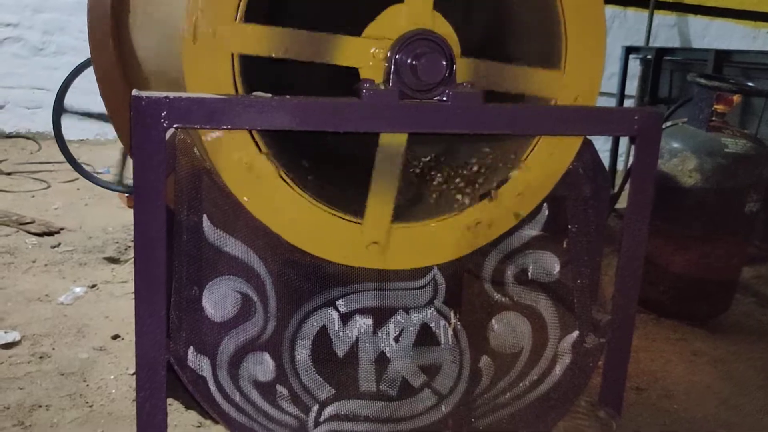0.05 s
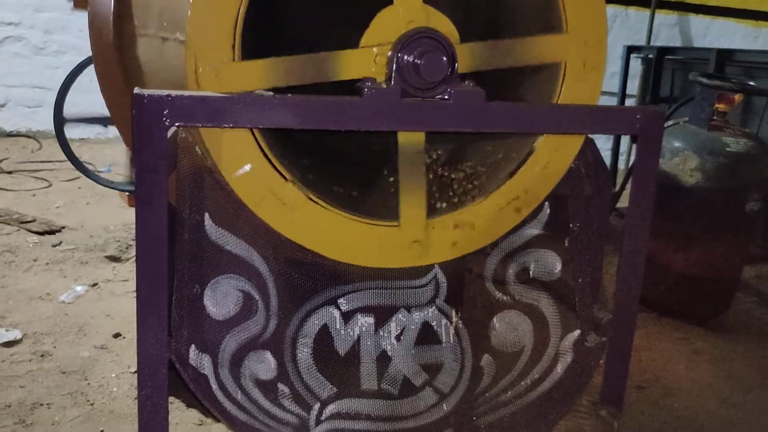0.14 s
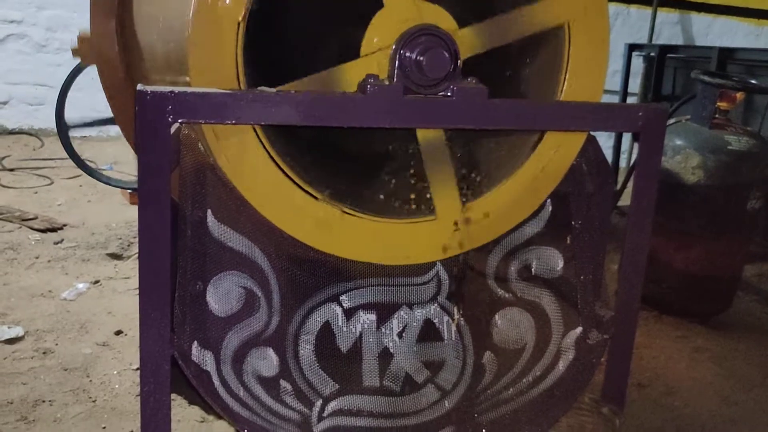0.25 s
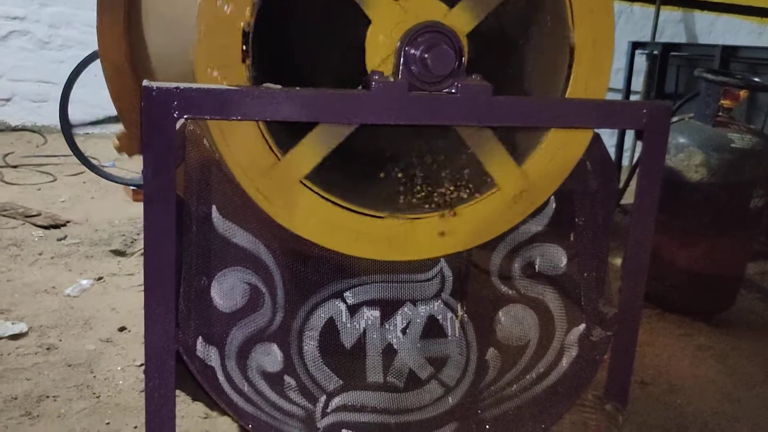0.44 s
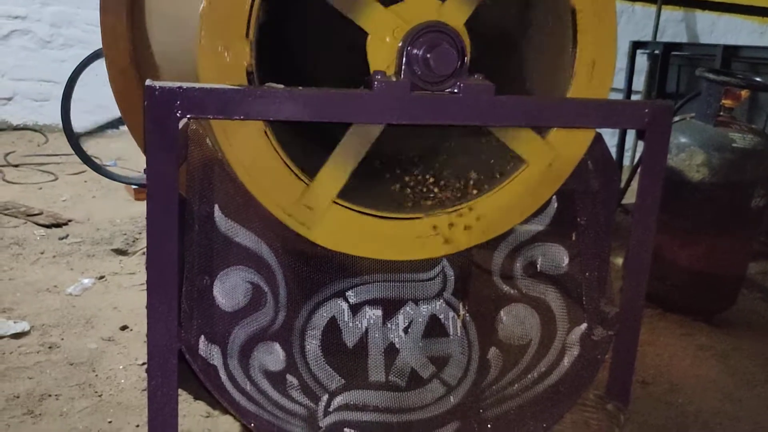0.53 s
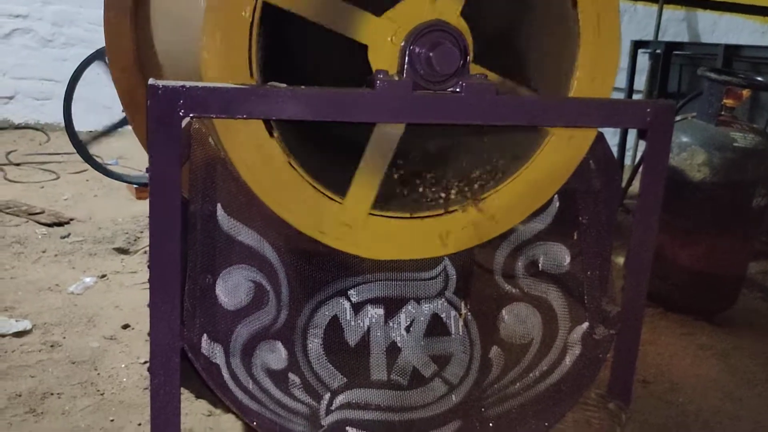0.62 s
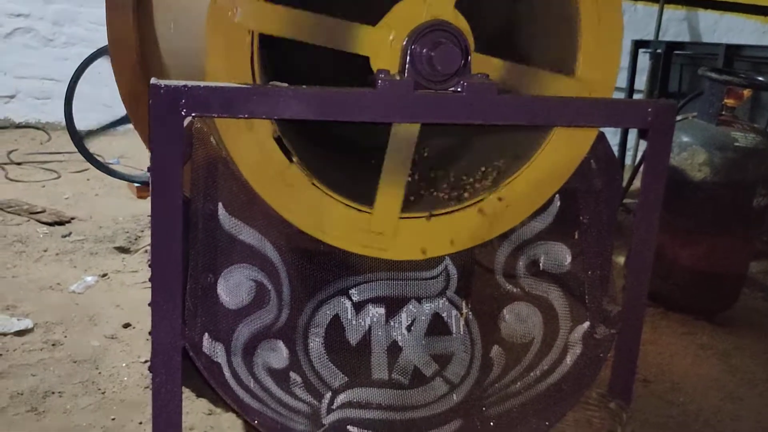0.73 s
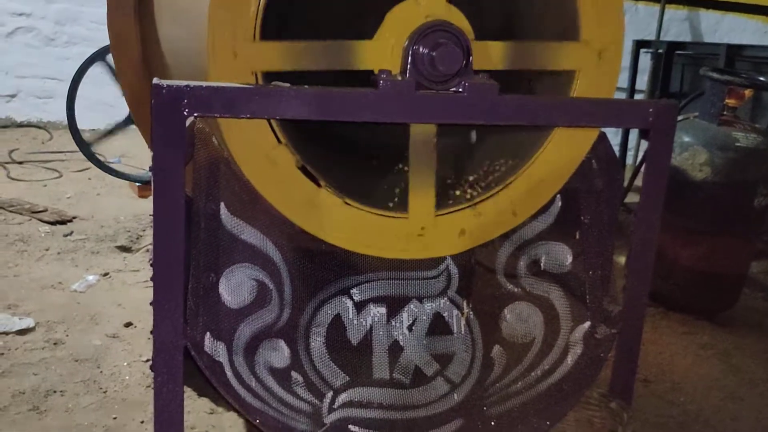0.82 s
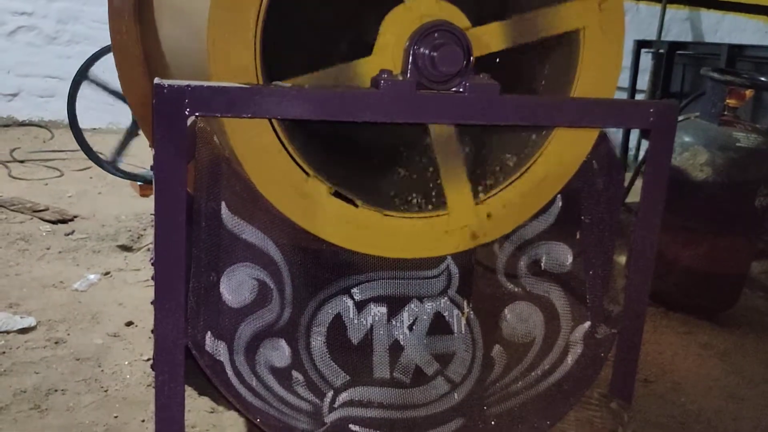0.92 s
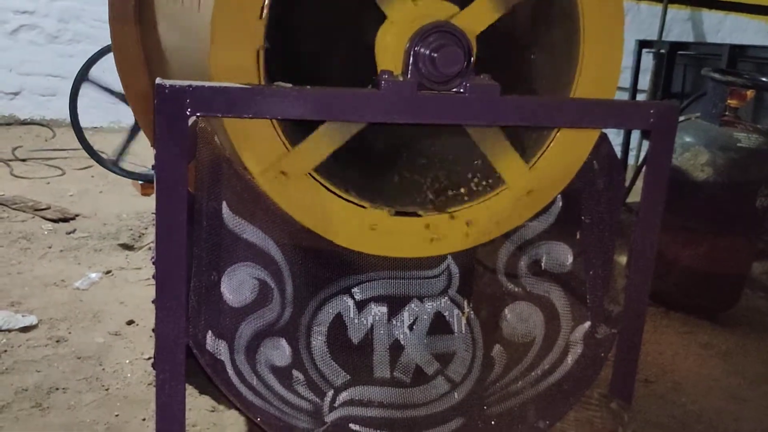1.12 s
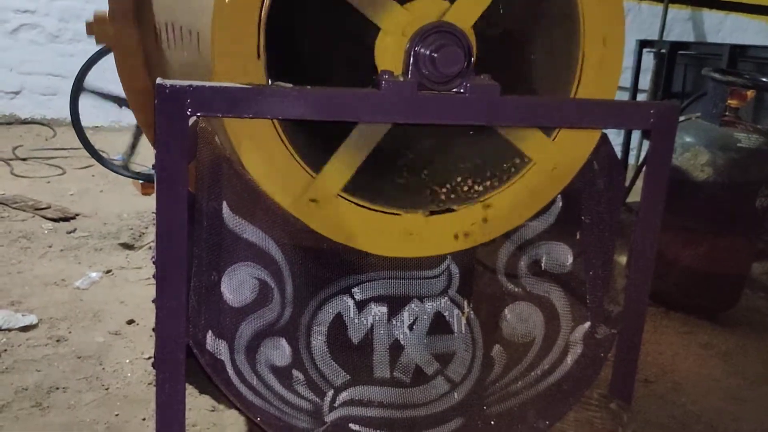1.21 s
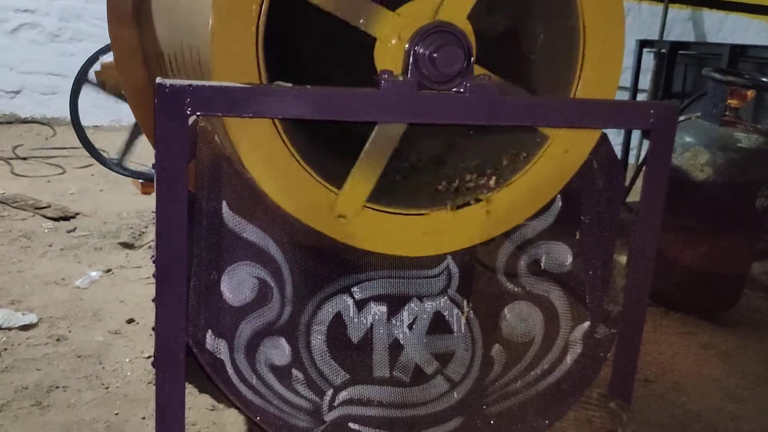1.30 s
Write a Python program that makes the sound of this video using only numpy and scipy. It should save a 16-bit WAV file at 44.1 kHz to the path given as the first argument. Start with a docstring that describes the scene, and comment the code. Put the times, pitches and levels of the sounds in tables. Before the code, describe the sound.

A steel roasting drum gives one sharp, rattling clank as an earlier one fades. The metal rings away while grain patters softly inside over a low burner rumble and motor hum, heard close by in an open yard.

```python
"""A loose part drops against a steel roasting drum that turns over a burner in an open yard, heard close by.
The impact gives a short, bright chatter and excites the shell's modes, which ring on in free decay;
an earlier clank is still dying away. Grain slides and patters inside, friction makes the steel sing
faintly, and a motor hums under the broadband rumble of the burner."""
import sys
import numpy as np
from scipy import signal
from scipy.fft import rfft, irfft
from scipy.io import wavfile

SR = 44100
rng = np.random.default_rng(int(sys.argv[2]) if len(sys.argv) > 2 else 0)


def store_wav(level_fs):
    """Save 16-bit WAV to argv[1]."""
    pcm = np.round(np.clip(np.atleast_2d(level_fs), -1, 1) * 32767)
    wavfile.write(sys.argv[1], SR, pcm.T.astype(np.int16))


N = 59535
TIME = np.arange(N) / SR

# drops of the loose part: start_s, gain_db
CLANK_EVENTS = [(-.26, 0), (.2385, 0)]
# contacts within one clank: delay_s, relative_db
CLANK_CONTACTS = [(0, -3), (.0045, 0), (.008, 1), (.0125, 0), (.0215, 1), (.025, -1)]
# strong modes of the shell: pitch_hz, relative_db, left_minus_right_db
SHELL_MODES = [(125.0, -26.0, -1.0), (244.0, -30.0, -3.0), (275.0, -29.0, 0.0), (355.0, -29.0, -1.0),
               (410.0, -25.0, -2.0), (432.0, -27.0, 8.0), (459.0, -29.0, -3.0), (564.0, -32.0, -4.0),
               (583.0, -30.0, 7.0), (614.0, -25.0, -7.0), (639.0, -32.0, 3.0), (814.0, -26.0, 5.0),
               (844.0, -27.0, 3.0), (873.0, -23.0, -11.0), (961.0, -34.0, 5.0), (1039.0, -25.0, -10.0),
               (1070.0, -27.0, 10.0), (1285.0, -33.0, 1.0), (1335.0, -34.0, -1.0), (4373.0, -33.0, -1.0),
               (5561.0, -26.0, -4.0), (5640.0, -29.0, 6.0), (6207.0, -18.0, 15.0), (6324.0, -23.0, 17.0),
               (6877.0, -24.0, -1.0), (7066.0, -27.0, -0.0), (7161.0, -19.0, -5.0)]
# spectrum of the steel's dense modes: frequency_hz, relative_density_db
STEEL_SPECTRUM = [(25, -18.5), (60, -17.5), (120, -4.5), (200, -10), (430, -7), (700, -5.5), (1000, -8.5),
                  (1400, -16), (2300, -9.5), (3300, -12), (4900, -8.5), (6100, 1.5), (7200, 6),
                  (7800, -6.5), (8600, -43.5)]
# decay time of the steel: frequency_hz, t60_s
STEEL_DECAY = [(100, 1.73), (400, 1.455), (900, 0.99), (1400, 0.99), (2500, 0.39), (4500, 0.28),
               (7000, 0.23)]
# damped resonances of the drum's body: pitch_hz, relative_db
BODY_MODES = [(112, -26), (141, -23), (446, -17), (835, -21), (1052, -25)]
# spectrum of the grain and the chatter: frequency_hz, relative_density_db
GRAIN_SPECTRUM = [(300, -3), (1200, -9.5), (2300, -2.5), (3400, -8.5), (5000, -5), (6300, 2), (7400, 2.5),
                  (7800, -6.5), (8150, -52)]
# flow of the grain: time_s, level_db
GRAIN_FLOW = [(0, -45), (.08, -43), (.2, -39), (.45, -39), (.55, -42), (.7, -39), (.77, -41.5), (.92, -42),
              (1.06, -45), (1.14, -40.5), (1.25, -47.5), (1.3, -46.5), (1.35, -45)]
# single kernels striking the steel: start_s, level_db
KERNEL_HITS = [(0.0236, -31), (0.4658, -34), (0.9311, -38), (1.0176, -36), (1.134, -52), (1.284, -34.5),
               (1.293, -34)]
# drum modes driven by the grain: pitch_hz, relative_db, left_minus_right_db
STIRRED_MODES = [(1730, -25, 5), (2331, -19, 2), (2420, -23, 5), (2990, -24, 5), (3410, -26, 1),
                 (4210, -26, -4), (4480, -24, 7), (4680, -26, 1), (4760, -25, 0), (5238, -20, 0),
                 (7063, -13, -8), (7390, -18, -9)]
# strength of the rubbing: time_s, gain_db
RUBBING_STRENGTH = [(0, 10.5), (.08, -11), (.15, 11), (.22, 9), (.5, 0), (.64, -2.5), (.72, 9.5),
                    (.78, 5.5), (.85, 0), (1.04, -15), (1.11, 7.5), (1.16, 5), (1.22, -5), (1.35, -16)]
# squeaks of scraped steel: centre_s, half_length_s, pitch_hz, level_db
SCRAPE_SQUEAKS = [(.69, .03, 7100, -47), (1.102, .022, 5260, -50), (1.16, .025, 5230, -57)]
# spectrum of the burner: frequency_hz, relative_density_db
BURNER_SPECTRUM = [(20, -36), (35, -38), (55, -3.5), (110, -2.5), (220, -4.5), (420, -11.5), (700, -13),
                   (1300, -20), (3000, -37.5), (8000, -73.5)]
# drone of the turning drum: pitch_hz, level_db
DRONE_MODES = [(122, -49.5), (185, -50.5), (274, -69), (355, -52), (431, -49.5)]
# hum of the motor: time_s, level_db
HUM_LEVEL = [(0, -47), (.68, -48), (.78, -41.5), (.98, -50), (1.1, -41), (1.35, -42)]
# likeness of the two channels: frequency_hz, correlation
STEREO_CORRELATION = [(100, 0.99), (250, 0.99), (500, 0.58), (1000, 0.4), (3000, 0), (7000, 0)]
# balance of the two channels: frequency_hz, left_minus_right_db
STEREO_BALANCE = [(100, -2.5), (600, -1), (1400, 3.5), (2500, 4.5), (5000, -0.5), (6300, 6.5), (7400, -5)]


def clank(dense_db=-5.5, bloom_s=0.0025):
    """Impact excitation: the energies of successive contacts add up in the vibrating steel."""
    t = np.arange(2 * N) / SR
    energy = sum(amp(db) ** 2 * (t >= delay) for delay, db in CLANK_CONTACTS)
    dense = amp(dense_db) * dense_modes(t)
    shell = shell_ring(t) * (1 - np.exp(-t / bloom_s))
    return body_boom(t) + np.sqrt(energy / energy[-1]) * (dense + shell)


def dense_modes(t):
    """Modal overlap: crowded modes merge into noise, and damping removes the treble first."""
    noise = colour(rng.standard_normal((2, len(t))), STEEL_SPECTRUM)
    hz, frame_s, spectra = signal.stft(noise, SR, nperseg=512)
    decay = amp(-60 * frame_s / at_hz(STEEL_DECAY, hz)[:, None])
    return signal.istft(spectra * decay, SR, nperseg=512)[1][:, :len(t)]


def shell_ring(t, gain_db=1):
    """Free vibration: each mode is a damped sinusoid, and modes close in frequency beat."""
    shell = 0
    for hz, db, side_db in SHELL_MODES:
        # the cosine of the phase gap between the channels is their correlation
        gap = np.arccos(at_hz(STEREO_CORRELATION, hz)) * rng.choice([-1, 1])
        phase = 2 * np.pi * rng.random() + np.array([[0], [gap]])
        ring = np.sin(2 * np.pi * hz * t + phase) * dying(t, at_hz(STEEL_DECAY, hz))
        shell = shell + amp(db + gain_db) * unit(pan(side_db)) * ring
    return shell


def body_boom(t, ramp_s=0.018, t60_s=0.21):
    """Damped resonance: the body's low modes swell and die quickly."""
    modes = sum(amp(db) * np.sin(2 * np.pi * hz * t) for hz, db in BODY_MODES)
    return modes * t / ramp_s * dying(t, t60_s)


def chatter(gain_db=-17, t60_s=0.071, spread_db=3, cracks_per_s=1400):
    """Sliding contact: each contact skids in a decaying run of bright, random impulses."""
    t = np.arange(SR // 4) / SR
    energy = sum((amp(db) * (t >= delay) * dying(abs(t - delay), t60_s)) ** 2
                 for delay, db in CLANK_CONTACTS)
    sizes = amp(spread_db * np.minimum(rng.exponential(1, len(t)), 4))
    cracks = sizes * (rng.random(len(t)) < cracks_per_s / SR) * rng.standard_normal((2, len(t)))
    return amp(gain_db) * np.sqrt(energy) * colour(cracks, GRAIN_SPECTRUM)


def grain(impacts_per_s=1600, spread_db=2, kernel_t60_s=0.037):
    """Shot noise: many small impacts over a sliding wash of equal power, with a few distinct kernels."""
    sizes = amp(spread_db * np.minimum(rng.exponential(1, N), 5))
    impacts = sizes * (rng.random(N) < impacts_per_s / SR) * rng.standard_normal((2, N))
    wash = rng.standard_normal((2, N))
    drive = level(GRAIN_FLOW) * unit(unit(impacts) + wash)
    t = np.arange(SR // 8) / SR
    for start_s, db in KERNEL_HITS:
        add(drive, start_s, amp(db) * dying(t, kernel_t60_s) * rng.standard_normal((2, len(t))))
    return np.std(drive) * colour(drive, GRAIN_SPECTRUM)


def stirred_steel(gain_db=2):
    """Forced vibration: the drum's modes ring faintly in proportion to the flow of grain."""
    return amp(gain_db) * level(GRAIN_FLOW) * resonances(STIRRED_MODES, width_hz=17)


def rubbing_steel(squeal_hz=2078, waver_hz=4, gain_db=-58.5, side_db=12):
    """Friction-induced vibration: a thin, wavering squeal and short, rough squeaks."""
    pitch_hz = squeal_hz + waver_hz * resonance(0, width_hz=40)
    squeal = unit(np.sin(2 * np.pi * np.cumsum(pitch_hz) / SR))
    sound = amp(gain_db) * level(RUBBING_STRENGTH) * unit(pan(side_db)) * squeal
    for centre_s, half_s, hz, db in SCRAPE_SQUEAKS:
        swell = np.exp(-((TIME - centre_s) / half_s) ** 2)
        sound += swell * resonances([(hz, db, 0)], width_hz=220)
    return sound


def burner(level_db=-43):
    """Combustion noise: a broadband rumble, strongest in the bass."""
    return amp(level_db) * colour(rng.standard_normal((2, N)), BURNER_SPECTRUM)


def drum_drone():
    """Narrowband resonance: the turning drum sustains a few low modes."""
    return sum(amp(db) * resonance(hz, width_hz=7) for hz, db in DRONE_MODES)


def motor_hum(pitch_hz=99.1):
    """Periodic vibration: the motor gives one low sinusoid whose level rises and falls."""
    return level(HUM_LEVEL) * unit(np.sin(2 * np.pi * (pitch_hz * TIME + rng.random())))


def resonance(hz, width_hz):
    """A randomly driven resonance: noise in a narrow peak around hz."""
    f = np.fft.rfftfreq(N, 1 / SR)
    phases = np.exp(2j * np.pi * rng.random(len(f)))
    return unit(irfft(phases / (1 + (2 * (f - hz) / width_hz) ** 2), N))


def resonances(modes, width_hz):
    """Superposed resonances, each placed by a level difference between the channels."""
    return sum(amp(db) * unit(pan(side_db)) * np.array([resonance(hz, width_hz) for _ in range(2)])
               for hz, db, side_db in modes)


def colour(x, spectrum):
    """Spectral shaping: two independent channels take on a spectrum and the machine's stereo image."""
    hz = np.fft.rfftfreq(x.shape[1], 1 / SR)
    left, independent = rfft(x)
    correlation = at_hz(STEREO_CORRELATION, hz)
    right = correlation * left + np.sqrt(1 - correlation ** 2) * independent
    shaped = np.array([left, right]) * amp(at_hz(spectrum, hz)) * pan(at_hz(STEREO_BALANCE, hz))
    return unit(irfft(shaped, x.shape[1]))


def dying(t, t60_s):
    """Exponential decay of 60 dB in t60_s."""
    return np.exp(-np.log(1000) * t / t60_s)


def amp(db):
    """Decibels to amplitude ratio."""
    return 10 ** (np.asarray(db) / 20)


def unit(x):
    """Normalisation to an rms of one."""
    return x / np.sqrt(np.mean(x ** 2) + 1e-20)


def at_hz(points, hz):
    """Interpolation on a log-frequency axis."""
    f, value = np.transpose(points)
    return np.interp(np.log(hz + 1), np.log(f + 1), value)


def level(points):
    """Amplitude envelope from a level curve in dB."""
    return amp(np.interp(TIME, *np.transpose(points)))


def pan(db):
    """Left and right gains for a level difference."""
    return amp(np.array([db, -db]).reshape(2, -1) / 2)


def add(mix, start_s, sound):
    """Superposes a stereo sound at start_s, which may be negative."""
    start = round(start_s * SR)
    sound = sound[:, max(-start, 0):]
    part = mix[:, max(start, 0):][:, :sound.shape[1]]
    part += sound[:, :part.shape[1]]


def scene():
    """Superposition: the clanks add to the sound of the running machine."""
    mix = burner() + drum_drone() + motor_hum() + grain() + rubbing_steel() + stirred_steel()
    for start_s, db in CLANK_EVENTS:
        add(mix, start_s, amp(db) * clank())
        add(mix, start_s, amp(db) * chatter())
    return mix


def record(dry, ceiling=0.88, cutoff_hz=8554):
    """Soft saturation rounds the highest peaks, then a low-pass filter limits the band."""
    rounded = dry / (1 + (dry / ceiling) ** 8) ** (1 / 8)
    lowpass = signal.firwin(301, cutoff_hz, window=("kaiser", 9), fs=SR)
    return signal.oaconvolve(rounded, lowpass[None], "same")


dry = scene()
out = record(dry)
store_wav(out)
```